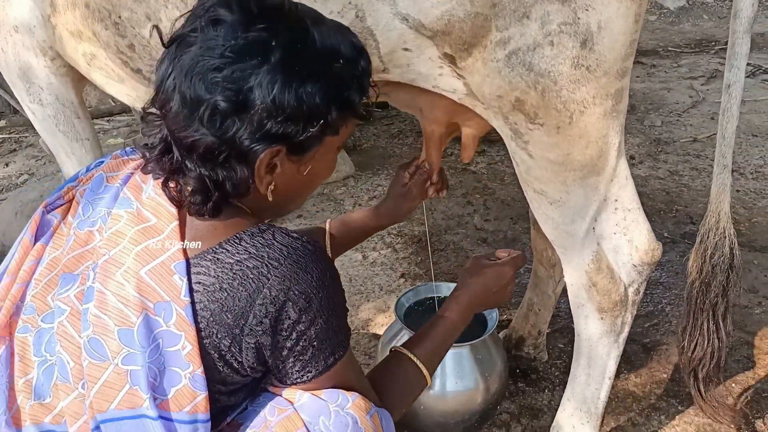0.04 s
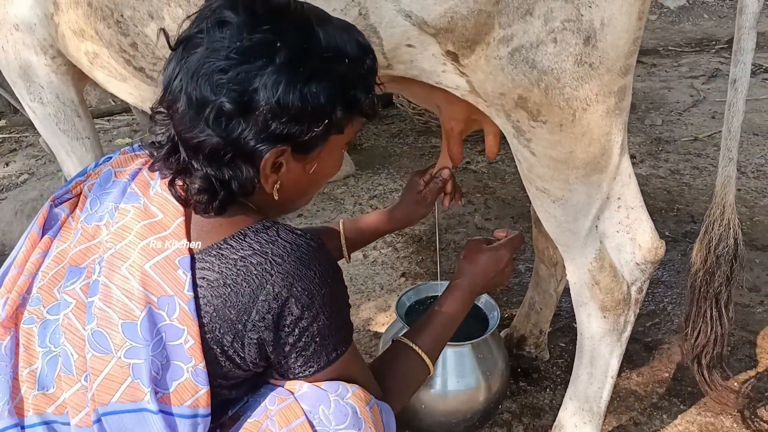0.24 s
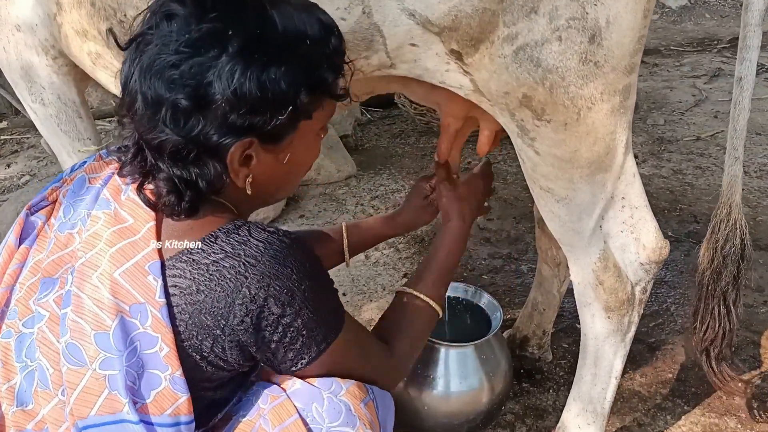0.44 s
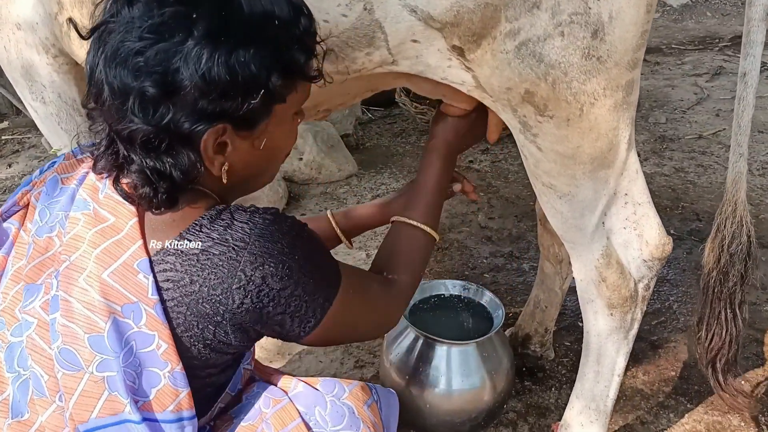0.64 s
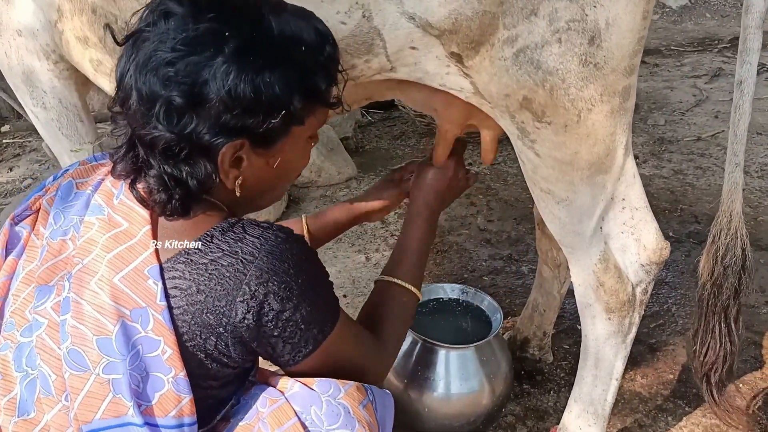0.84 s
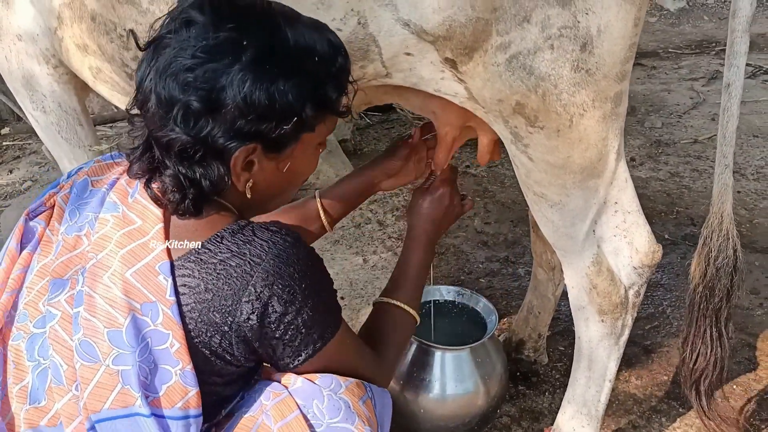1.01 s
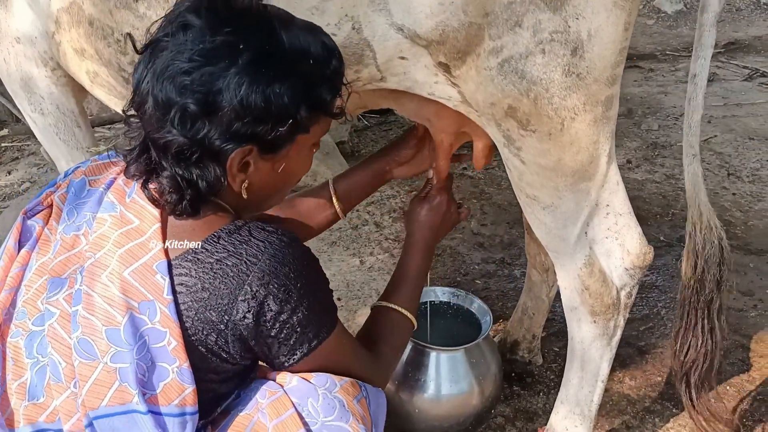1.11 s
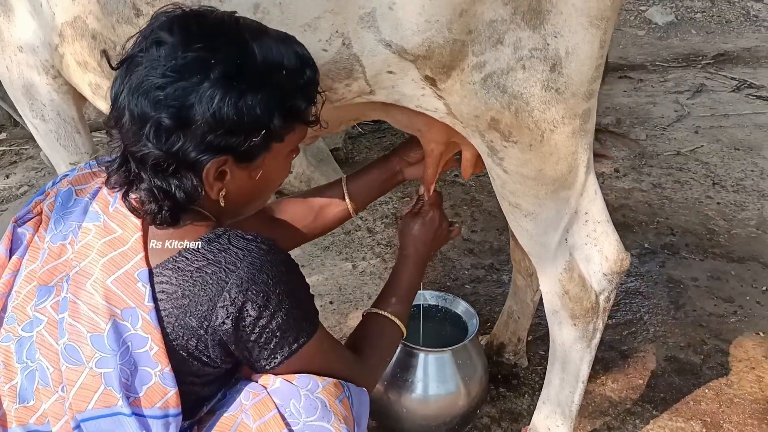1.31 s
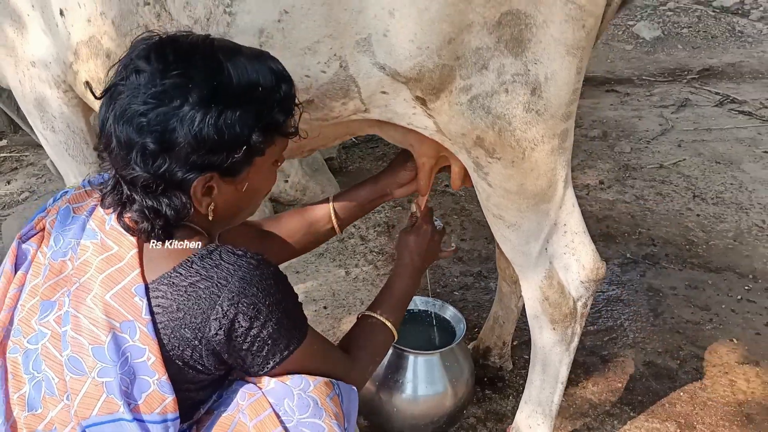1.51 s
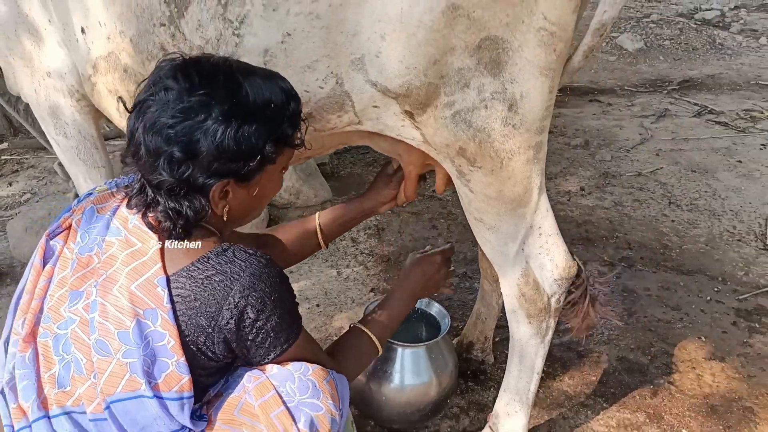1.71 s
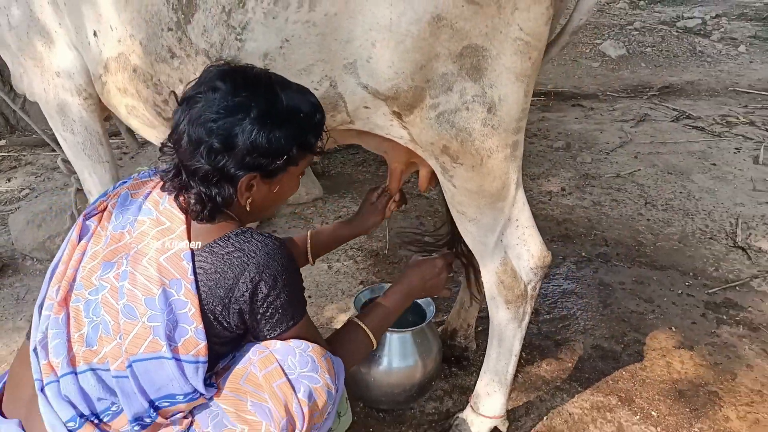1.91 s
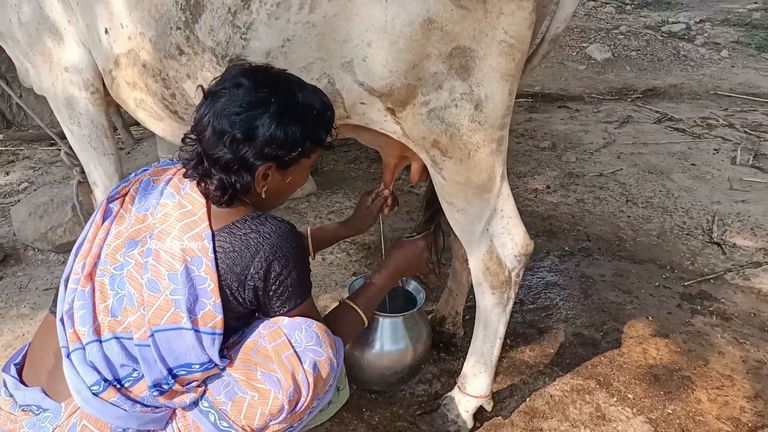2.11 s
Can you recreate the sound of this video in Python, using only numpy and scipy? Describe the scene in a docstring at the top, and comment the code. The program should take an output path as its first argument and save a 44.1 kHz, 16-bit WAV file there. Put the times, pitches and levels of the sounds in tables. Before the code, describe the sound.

Milk squirts into a steel pot as a cow is hand-milked, a small bird whistling.

```python
"""A cow is milked by hand into a round steel pot, outdoors in light wind. First one squirt breaks into
droplets that hiss and patter in the pot, churns bubbles in the milk and makes the air in the pot hum;
fat drops smack in between. As it ends, a hand rustles and a small bird starts repeating a rising whistle.
Just after one second comes a second squirt, and a gust nudges the microphone. The hand rustles again,
and a third squirt is just starting at the end."""
import sys
import numpy as np
from scipy import signal
from scipy.fft import rfft, irfft, next_fast_len
from scipy.io import wavfile
from scipy.ndimage import uniform_filter1d

SR = 44100
rng = np.random.default_rng(int(sys.argv[2]) if len(sys.argv) > 2 else 0)


def wav_record(signal):
    """Record a signal, one row per channel, as 16-bit PCM in the file named by sys.argv[1]."""
    frames = np.transpose(np.atleast_2d(signal))
    bounded = np.clip(frames, -1, 1)
    # unit amplitude maps onto the largest positive 16-bit level
    quanta = np.round(bounded * 32767).astype(np.int16)
    wavfile.write(sys.argv[1], SR, quanta)


N = 94815


# how much louder the pot is on the left than on the right: f/Hz, level/dB
POT_BALANCE = [(300, 1.5), (1000, 4), (1650, 3.5), (2100, -5.5), (2700, 2), (3700, 8), (4900, -4),
               (6300, 3.5), (7600, -1), (8800, 1.5), (11500, 5.5), (15000, 0.5)]
def milking():
    """Milk lands in the pot, a little to the left, and the yard echoes it faintly."""
    pot = squirts() + fat_drops() + wall_ring()
    yard = undb(-16.5) * convolve(pot.mean(0), tail(t60=0.26))
    left = colour(pot[0], [(hz, db / 2) for hz, db in POT_BALANCE])
    right = colour(pot[1], [(hz, -db / 2) for hz, db in POT_BALANCE])
    return np.array([left, right]) + yard


def squirts():
    """Each jet of milk sputters, its four sounds swelling and then dying away when it stops."""
    hiss_gain, patter_gain, froth_gain = (squirt_level(col, fall_db_per_s=502) for col in (1, 2, 3))
    hum_gain = squirt_level(4, fall_db_per_s=208)
    sputter = undb(2.4 * wander(per_s=220))
    splash = hiss() * hiss_gain + patter() * patter_gain + froth() * froth_gain
    return wandering_jet(splash) * sputter + pot_hum() * hum_gain


# one list per squirt: t/s, then relative level/dB of hiss, patter, froth and hum
SQUIRTS = [
    [(0.125, -95, -81, -93, -83), (0.145, -67.5, -66.5, -67.5, -53), (0.217, -57, -55, -52.5, -86),
     (0.224, -56, -39, -49.5, -73), (0.237, -65, -51, -48, -69.5), (0.363, -58, -41.5, -49.5, -41),
     (0.389, -60.5, -43.5, -53, -57), (0.452, -50, -45, -54, -41.5), (0.471, -50, -32.5, -49, -56),
     (0.509, -49, -44, -56.5, -44.5), (0.605, -46.5, -46, -59, -42), (0.641, -46, -46.5, -77, -52),
     (0.708, -52, -59.5, -74, -44.5), (0.735, -60.5, -53.5, -91, -57.5)],
    [(1.12, -68, -66, -87, -73), (1.14, -66.5, -66, -73.5, -66), (1.222, -45.5, -37, -38, -86),
     (1.238, -52.5, -51.5, -47, -64), (1.276, -52.5, -54, -42, -58), (1.318, -48.5, -52.5, -41.5, -87),
     (1.342, -52, -53, -43.5, -51), (1.412, -53.5, -50, -42, -45), (1.538, -61.5, -49.5, -46, -44.5),
     (1.582, -62, -55, -53.5, -38.5), (1.634, -63, -68, -54, -41.5), (1.692, -70, -70, -81, -55.5),
     (1.724, -65.5, -59.5, -64, -62.5), (1.74, -78, -71, -80, -74)],
    [(2.118, -85, -71, -87, -88), (2.133, -65, -64.5, -60, -83), (2.15, -63, -59.5, -66, -71)],
]
def squirt_level(column, fall_db_per_s):
    """Follow one level of the squirts through time, fading after each one's last row."""
    t, gain = np.arange(N) / SR, np.zeros(N)
    for rows in map(np.array, SQUIRTS):
        db = np.interp(t, rows[:, 0], rows[:, column], left=-200)
        gain += undb(db - fall_db_per_s * np.maximum(t - rows[-1, 0], 0))
    return gain


# tone of the fine spray: f/Hz, level/dB
HISS_TONE = [(2500, -22), (4800, -3.5), (5500, 2), (6500, 2.5), (7400, -3), (9000, 2), (10500, -2),
             (11800, 3.5), (13500, -0.5), (15500, -2)]
# the spray grazes the steel: t/s, length/s, level/dB compared with the hiss
SIZZLES = [(.53, .13, -43), (1.34, .1, -60)]
def hiss():
    """Tiny droplets blur into a hiss, with a faint sizzle where they graze the steel."""
    grazing = resonate(scattered(droplets, per_s=2200), hz=6300, widths_hz=(1700, 1700))
    sizzle = even(grazing, 0.052) * swells(SIZZLES)
    spray = even(colour(scattered(droplets, per_s=2200), HISS_TONE), 0.0053)
    return (spray + sizzle) * undb(0.5)


# tone of droplets tapping on steel: f/Hz, level/dB
PATTER_TONE = [(400, -7.5), (600, -11), (1000, -7.5), (1900, -2.5), (2200, -3), (2700, 4.5), (3500, 3),
               (4200, 5), (4900, -6), (6000, -5.5), (9000, -41)]
def patter():
    """Droplets drum on the inside of the pot."""
    return even(colour(scattered(droplets, per_s=3500), PATTER_TONE), 0.036) * undb(-6)


def droplets(per_s):
    """Droplets hit at random moments, each a click of a different size."""
    hits = rng.random(N) < per_s / SR
    return hits * rng.choice([-1, 1], N) * undb(2.8 * np.minimum(rng.exponential(size=N), 4))


# tone of the bubbling milk: f/Hz, level/dB
FROTH_TONE = [(200, -8.5), (450, -3.5), (620, -12), (850, -1), (1070, 5), (1280, -0.5), (1530, 7.5),
              (1750, -2), (2000, -5.5), (3500, 6)]
def froth():
    """The jet churns the milk into a foam of bubbles."""
    return even(colour(scattered(bubbles, per_s=900), FROTH_TONE), 0.0059) * undb(-5)


def bubbles(per_s, ring_cycles=13.8, glide=0.014):
    """Each small bubble rings for a moment while its pitch slides up a little."""
    out, t = np.zeros(N), np.arange(SR // 30) / SR
    for when, pitch, softness in rng.random((int(per_s * N / SR), 3)):
        hz = 480 * 4.4 ** pitch
        t60 = ring_cycles / hz
        tone = np.sin(2 * np.pi * hz * t * (1 + glide * t / t60))
        add(out, when * N / SR, undb(-14 * softness) * np.sqrt(hz) * fade(t, t60) * tone)
    return out


def pot_hum():
    """The air in the pot hums at one low note, with softer gulps from the droplets."""
    hum = even(resonate(rng.standard_normal(N), hz=301.8, widths_hz=(11.8, 78)), 0.033)
    gulps = even(resonate(droplets(per_s=300), hz=280, widths_hz=(124, 124)), 0.067)
    return (hum + undb(-11.5) * gulps) * undb(-2.5)


def wandering_jet(x, bands=22):
    """The jet wanders over the pot, so each band of pitches swells and fades on its own."""
    out, centres = np.zeros((2, N)), np.log(np.geomspace(700, 15000, bands))
    for weights in np.eye(bands):
        band = shape(x, lambda f: np.interp(np.log(f), centres, weights))
        out += band * undb(3.5 * wander(per_s=60))
    return out


# fat drops: t/s, relative level/dB, ping f/Hz, rise time/s, smack level/dB compared with the ping
FAT_DROPS = [(0.1396, -55, 3640, 0.00089, 7.5), (0.22, -29.5, 2950, .0017, -11),
             (0.2723, -32, 3900, 0.00068, -7.5), (0.4593, -30.5, 2780, 0.001, -13),
             (0.463, -33.5, 4480, .0007, -6), (.467, -51, 2230, .003, -19), (.478, -36, 3190, 0.0014, -8),
             (0.663, -30.5, 6500, 0.00054, -13), (0.7408, -32.5, 3150, 0.00093, 0.5),
             (0.751, -54.5, 5500, 0.00097, 8), (1.212, -31, 3060, 0.0014, -9.5),
             (1.2184, -34.5, 1046, 0.0022, 0.5), (1.586, -42, 10160, 0.0014, -20),
             (1.704, -48, 5770, 0.0013, 1.5)]
# tone of a drop landing: f/Hz, level/dB
SMACK_TONE = [(200, -5), (1100, -8), (3000, -4.5), (6000, 1), (9000, -6), (15000, -9.5)]
def fat_drops(ring_share=0.22):
    """A fat drop lands with a quick smack and a ping, and lightly rings the steel."""
    out, t = np.zeros(N), np.arange(SR // 20) / SR
    for at, db, hz, rise_s, smack_db in FAT_DROPS:
        smack = undb(smack_db) * rng.standard_normal(len(t))
        ping = np.sin(2 * np.pi * hz * t)
        swell = (t / rise_s * np.exp(1 - t / rise_s)) ** 2
        add(out, at, undb(db) * (ping + smack) * swell)
    landed = in_pot(colour(out, SMACK_TONE), echo_db=-10)
    return landed + ring_share * (steel(landed) - landed)


# late in a squirt the jet strays onto the bare wall: t/s, length/s, level/dB
WALL_STRIKES = [(.69, .04, -60), (1.54, .1, -61)]
def wall_ring(fall_db_per_s=293):
    """The steel wall sings while the jet drums on it and rings on afterwards."""
    t, gain = np.arange(N) / SR, np.zeros(N)
    for at, length, db in WALL_STRIKES:
        rise = np.clip(2 * (t - at) / length, 0, 1)
        gain += rise * undb(db - fall_db_per_s * np.maximum(t - at - length, 0))
    ring = resonate(droplets(per_s=3500), hz=3537, widths_hz=(160, 320))
    return even(ring, 0.06) * gain


# the notes the pot rings at: f/Hz, ring time/s, level/dB
POT_NOTES = [(1044, 0.034, -3), (1540, 0.12, -8.5), (1715, 0.19, 5.5), (2560, 0.032, -6.5),
             (2830, 0.18, -12), (3042, 0.088, 6.5), (3457, 0.19, 6.5)]
def steel(x):
    """The steel adds its own ringing notes; the longer a note rings, the narrower its peak."""
    def ringing(f):
        return sum(undb(db) * peak(f, hz, np.log(1000) / (np.pi * t60)) for hz, t60, db in POT_NOTES)
    return shape(x, lambda f: 1 + ringing(f))


def in_pot(x, echo_db):
    """Sound bounces quickly around the pot; the ears hear the high echoes differently."""
    echo = convolve(x, tail(t60=0.042))
    side = shape((echo[0] - echo[1]) / 2, lambda f: f ** 2 / np.hypot(f ** 2, 1850 ** 2))
    return x + undb(echo_db) * (echo.mean(0) + np.array([side, -side]))


def scattered(source, per_s, spots=5):
    """The milk lands on several spots in the pot, each with its own echo."""
    return steel(sum(in_pot(source(per_s / spots), echo_db=5.5) for _ in range(spots)))


# plops and bumps around the pot: t/s, level/dB, f/Hz, ring time/s
BUMPS = [(.135, -60, 318, 0.19), (0.232, -45, 442, 0.1), (0.489, -48, 183, 0.22), (0.533, -47.5, 428, 0.18),
         (0.554, -52.5, 194.5, 0.45), (.64, -55.5, 612, 0.14), (.655, -50, 421.4, 0.22),
         (0.875, -55.5, 227, 0.35), (1.175, -48.5, 235.4, 0.35), (1.175, -44.5, 550, 0.045),
         (1.794, -48, 240.4, 0.24)]
def bumps(rise_s=0.0014):
    """Each hollow plop or dull bump is one low tone that dies away."""
    out, t = np.zeros(N), np.arange(SR // 3) / SR
    rise = 1 - np.exp(-t / rise_s)
    for at, db, hz, t60 in BUMPS:
        add(out, at, undb(db) * np.sin(2 * np.pi * hz * t) * fade(t, t60) * rise)
    return out


# the bird's calls: t/s at the top of the whistle, level/dB, extra level/dB at its low start
BIRD_CALLS = [(.836, -49, -13), (1.195, -49, -5), (1.533, -48, -6), (1.857, -50, 1), (2.2, -55, -3)]
# the shape of one whistle: t/s from its top, f/Hz, relative level/dB
WHISTLE = [(-.13, 2170, -32), (-.118, 2130, -14), (-.098, 1970, -15), (-.078, 2030, -15),
           (-.048, 2480, -10), (-.026, 3000, -6), (-.01, 3850, 0), (-.001, 4500, -2), (.005, 4550, -11),
           (.01, 4300, -30)]
def bird():
    """A thin whistle dips and sweeps upward; nearby walls smear it and the yard echoes it."""
    out, (when, hz, db) = np.zeros(N), np.array(WHISTLE).T
    t = np.arange(when[0], when[-1], 1 / SR)
    for top_s, top_db, start_db in BIRD_CALLS:
        level_db = top_db + start_db * t / when[0] + np.interp(t, when, db)
        pitch = np.interp(t, when, hz) * (1 + 0.0088 * wander(per_s=90.5)[:len(t)])
        flutter_db = 2.5 * wander(per_s=199)[:len(t)]
        tone = np.sin(2 * np.pi * np.cumsum(pitch) / SR)
        add(out, top_s + when[0], undb(level_db + flutter_db) * tone)
    walls, yard = undb(-3) * tail(t60=0.07), undb(-6) * tail(t60=0.21)
    return pan(2.5) * (out + convolve(out, walls + yard))


# rustles between squirts: t/s, length/s, level/dB
RUSTLES = [(0.776, 0.14, -66.5), (1.738, 0.25, -66)]
# their tone: f/Hz, level/dB
RUSTLE_TONE = [(200, 12.5), (600, 2.5), (1000, -11), (1700, -3), (3000, 6.5), (5000, -8), (12000, -10),
               (15000, -12)]
def rustle():
    """Hand and cloth swish softly as the grip changes."""
    noise = rng.standard_normal(N) + rng.standard_normal((2, N))
    return unit(colour(noise, RUSTLE_TONE)) * swells(RUSTLES) * undb(2.2 * wander(per_s=64))


# strength of the wind: t/s, relative level/dB
GUSTS = [(0.0, -71.5), (0.13, -62), (0.3, -65), (0.46, -57), (0.68, -67), (0.77, -57.5), (1.2, -69.5),
         (1.27, -45.5), (1.33, -60.5), (1.57, -70), (1.87, -59.5), (2.05, -81.5), (2.09, -65.5),
         (2.15, -72)]
# tone of its rumble: f/Hz, level/dB
WIND_TONE = [(15, -3.5), (42, -3), (70, -5), (110, -22.5), (200, -30), (400, -35), (1000, -74.5)]
def wind():
    """Wind pushes on the microphone and makes a low rumble, stronger on the left."""
    when, db = np.array(GUSTS).T
    noise = rng.standard_normal(N) + undb(10) * rng.standard_normal((2, N))
    rumble = even(colour(noise, WIND_TONE) * pan(8.5), 0.017)
    return rumble * undb(6 + np.interp(np.arange(N) / SR, when, db))


# tone of the outdoor background: f/Hz, level/dB
AIR_TONE = [(30, -8), (120, 6.5), (250, -4.5), (450, -5), (800, -16), (1500, -20), (2800, -15), (4500, -19),
            (8000, -23), (15000, -23.5)]
def air():
    """Quiet village air makes a soft hush, its high part spread from left to right."""
    middle, side = colour(rng.standard_normal((2, N)), AIR_TONE)
    side = shape(side, lambda f: f / np.hypot(f, 1550))
    return unit(middle + np.array([side, -side])) * undb(-67.5 + wander(per_s=8.06))


def undb(db):
    """Turn decibels into a number to multiply by."""
    return 10 ** (np.asarray(db) / 20)


def unit(x):
    """Scale a sound to an average power of 1."""
    return x / np.sqrt(np.mean(x ** 2) + 1e-20)


def pan(db):
    """Gains that make the left ear db louder than the right."""
    return undb(np.array([[db], [-db]]) / 2)


def shape(x, gain):
    """Turn each frequency f up or down by gain(f)."""
    size = next_fast_len(N + 16384)
    f = np.maximum(np.arange(size // 2 + 1) * SR / size, 1)
    return irfft(rfft(x, size) * gain(f), size)[..., :N]


def colour(x, points):
    """Set a sound's tone from rows of f/Hz, level/dB."""
    hz, db = np.array(points, float).T
    return shape(x, lambda f: undb(np.interp(np.log(f), np.log(hz), db)))


def peak(f, hz, width_hz):
    """The response of something that rings at hz, with gain 1 there."""
    return 1 / (1 + 1j * (f ** 2 - hz ** 2) / (f * width_hz))


def resonate(x, hz, widths_hz):
    """Make a sound ring at hz, filtering it once for each width."""
    for width in widths_hz:
        x = shape(x, lambda f: peak(f, hz, width))
    return x


def even(x, span_s):
    """Hold the level at 1, keeping only flickers shorter than span_s."""
    power = np.atleast_2d(x).mean(0) ** 2
    span = max(int(span_s * SR), 2)
    return x / np.sqrt(np.abs(uniform_filter1d(uniform_filter1d(power, span), span)) + 1e-18)


def wander(per_s):
    """Drift between random values, mostly from -1 to 1."""
    values = rng.standard_normal(2048)
    return np.interp(np.arange(N) / SR * per_s, np.arange(len(values)), values)


def swells(rows):
    """Rounded rises and falls from rows of t/s, length/s, level/dB."""
    t = np.arange(N) / SR
    return sum(undb(db) * np.sqrt(np.abs(np.sin(np.pi * np.clip((t - at) / length, 0, 1))))
               for at, length, db in rows)


def fade(t, t60):
    """Die away by 60 dB in t60 seconds, the ring time."""
    return np.exp(-np.log(1000) * t / t60)


def add(out, at_s, x):
    """Mix a short sound in at a time."""
    i = int(np.clip(at_s * SR, 0, N))
    out[i:i + len(x)] += x[:N - i]


def tail(t60):
    """A fading blur of echoes, different in each ear."""
    t = np.arange(SR // 2) / SR
    echoes = rng.standard_normal((2, len(t))) * fade(t, t60)
    return echoes / np.sqrt((echoes ** 2).sum(1, keepdims=True))


def convolve(x, echoes):
    """Play a sound through left and right echoes."""
    return signal.fftconvolve(x[None], echoes, axes=1)[:, :N]


def scene():
    """The milking, with bird, wind and air around it."""
    return milking() + bumps() + rustle() + bird() + wind() + air()


def record(dry, top_hz=15700):
    """The very highest sounds are cut off."""
    return signal.sosfilt(signal.ellip(10, .2, 80, top_hz, fs=SR, output="sos"), dry)


dry = scene()
out = record(dry)
wav_record(out)
```